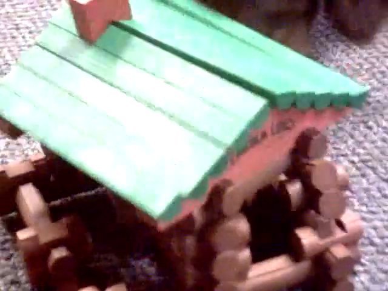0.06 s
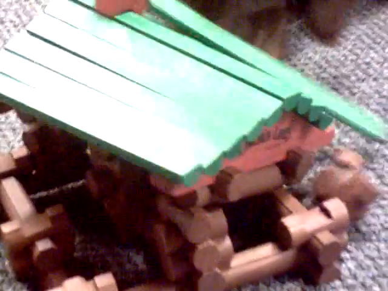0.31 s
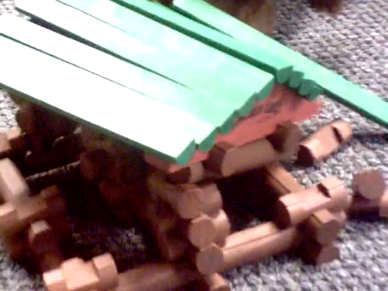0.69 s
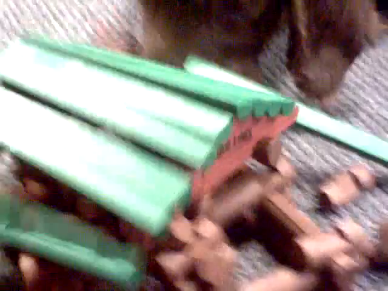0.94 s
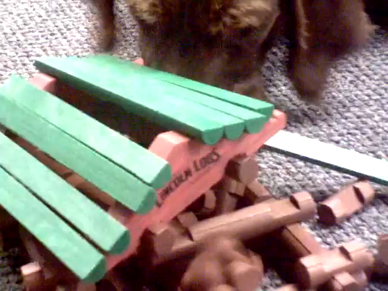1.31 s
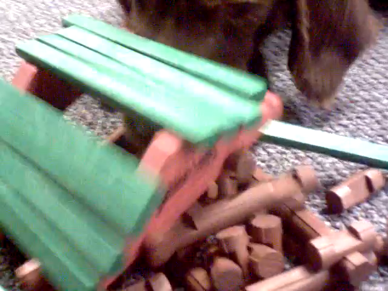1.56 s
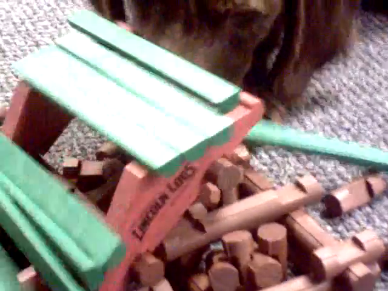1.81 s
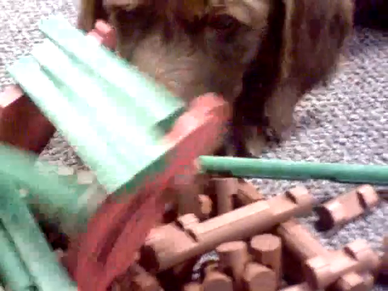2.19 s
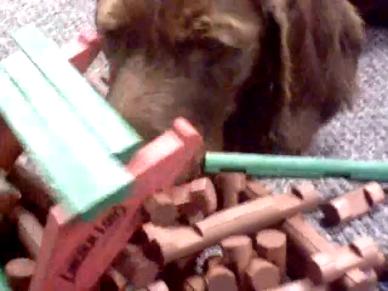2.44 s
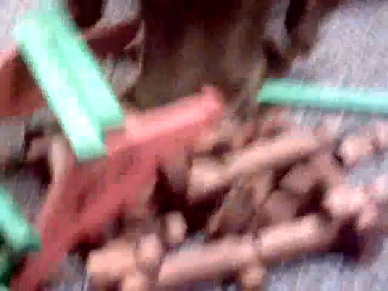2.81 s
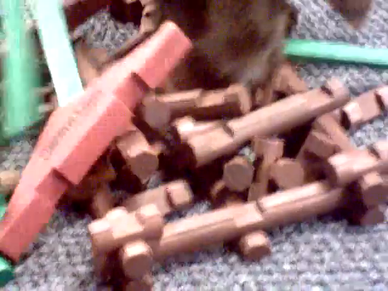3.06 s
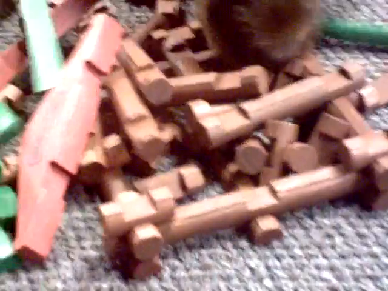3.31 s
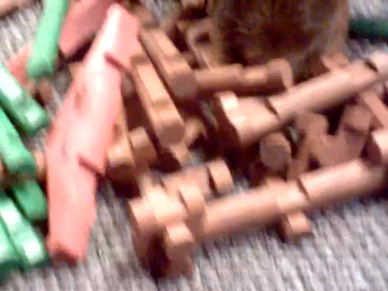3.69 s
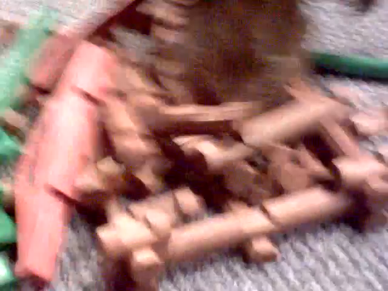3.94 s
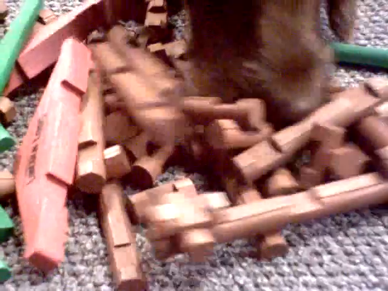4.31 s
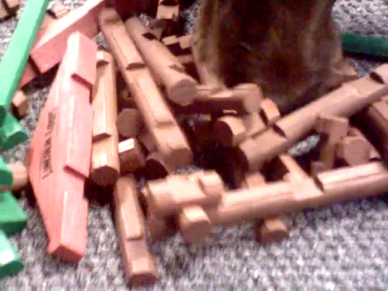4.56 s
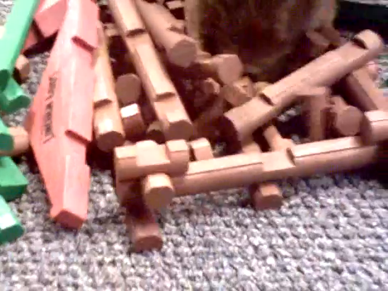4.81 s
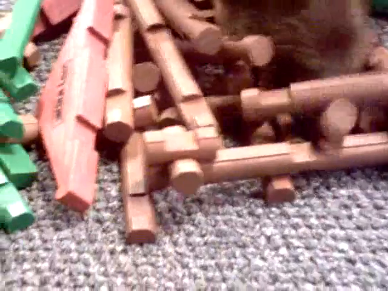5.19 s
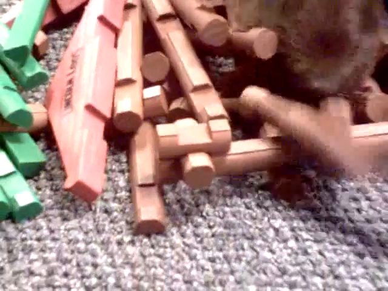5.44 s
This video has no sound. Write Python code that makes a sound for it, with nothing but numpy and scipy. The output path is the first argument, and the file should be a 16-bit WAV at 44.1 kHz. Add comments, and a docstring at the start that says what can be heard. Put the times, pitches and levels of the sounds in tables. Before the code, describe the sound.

A toy house of small wooden logs is nudged apart on a carpet in a small room. Slats and logs rub, crack and topple in several bright, dry bursts with soft thuds, getting busiest past the two-second mark. After about three seconds the clatter settles into light, scattered clicks of loose pieces. The close microphone hisses steadily and distorts briefly on the loudest knocks.

```python
"""Wood rubs and knocks, close up, as a toy house of small logs is nudged apart on a carpet.
Roof slats and logs chatter, topple and thud down, then loose pieces click in the pile.
Each knock is a dry crack plus the bending modes of the two pieces that meet.
The room is small; the narrow-band microphone hisses, and its preamplifier overloads on the loudest blows."""
import sys
import numpy as np
from scipy import signal
from scipy.fft import rfft, irfft
from scipy.io import wavfile

SR = 44100
rng = np.random.default_rng(int(sys.argv[2]) if len(sys.argv) > 2 else 0)


def persist_wave(psi):
    """Save psi, clipped to +-1, as 16-bit WAV."""
    counts = np.round(np.clip(psi, -1, 1) * 32767).astype(np.int16)
    wavfile.write(sys.argv[1], SR, np.atleast_2d(counts).T)


N = 255994
AGE = np.arange(SR // 4) / SR  # seconds since a contact


def undb(db):
    """Decibels to gain."""
    return 10 ** (np.asarray(db) / 20)


def level(x, db):
    """Scale a sound to an rms level."""
    return x * undb(db) / np.sqrt(np.mean(x ** 2))


def add(track, s, sound):
    """Mix a sound into a track at s seconds."""
    i = max(int(s * SR), 0)
    track[i:i + len(sound)] += sound[:max(N - i, 0)]


def through(x, response):
    """Pass a sound through an impulse response."""
    return signal.fftconvolve(x, response)[:len(x)]


def colour(points, size=4096):
    """Causal response of unit energy, its spectrum shaped by (Hz, dB) points."""
    hz, db = np.transpose(points)
    bin_hz = np.maximum(np.arange(size // 2 + 1) * SR / size, 1)
    gain = undb(np.interp(np.log(bin_hz), np.log(hz), db))
    cepstrum = irfft(np.log(gain))
    cepstrum[1:size // 2] *= 2  # fold to minimum phase
    cepstrum[size // 2 + 1:] = 0
    response = irfft(np.exp(rfft(cepstrum)))
    return response / np.linalg.norm(response)


def mic_band(x, top_hz=4350, taps=261):
    """Steep roll-off at the top of the microphone's band."""
    lowpass = signal.firwin(taps, top_hz, window=("kaiser", 7), fs=SR)
    return signal.fftconvolve(x, lowpass, "same")


def fade(t60):
    """Exponential decay, 60 dB down after t60 seconds."""
    return np.exp(-np.log(1000) * AGE / t60)


def mode(hz, t60, contact_s=0.00027):
    """One struck mode; it builds up while the pieces touch."""
    return np.cos(2 * np.pi * hz * AGE) * fade(t60) * (1 - np.exp(-AGE / contact_s))


def mic_hiss(hiss_db=-46, whine_db=-48):
    """The microphone's steady hiss, with a thin, wavering whine in it."""
    # Spectrum of the hiss. Each row: frequency in Hz, relative level in dB.
    hiss_spectrum = [(20, 0.5), (60, -16), (150, -8), (300, -3), (600, -0.5), (1000, -4.5), (1500, -3),
                     (2200, -7), (2950, -7), (3350, -0.5), (3700, -2.5), (4050, -10), (4450, -27)]
    hiss = mic_band(through(rng.standard_normal(N), colour(hiss_spectrum)))
    whine = mic_band(through(rng.standard_normal(N), mode(hz=3342, t60=0.1)))
    return level(hiss, hiss_db) + level(whine, whine_db)


def shove(s, length, release_db_per_s, attack_s=0.018, sag_db_per_s=19):
    """Envelope of a shove: it builds quickly and loses force while it lasts, then the pile comes to rest."""
    age = np.maximum(np.arange(N) / SR - s, 0)
    fall_db = sag_db_per_s * age + release_db_per_s * np.maximum(age - attack_s - length, 0)
    return np.minimum(age / attack_s, 1) * undb(-fall_db)


def pile_ring(detune=0.0287, build_s=0.001):
    """Every contact shakes the neighbouring pieces in a different mix."""
    # Modes of the pile. Each row: pitch in Hz, relative level in dB, 60 dB decay time in seconds.
    pile_modes = [(1193, -2, 0.069), (1341, 1.5, 0.075), (1642, 2, 0.03), (1890, 4, 0.058),
                  (2096, -1.5, 0.3), (2267, -1.5, 0.21), (2785, 7.5, .04), (3123, 15, 0.07),
                  (3330, -15, 0.2), (3400, -21, .05), (3508, 17, 0.064), (3530, -10.5, 0.028),
                  (3782, 6, 0.14), (3760, -4.5, 0.066), (4310, -4.5, 0.11)]
    chance = rng.standard_normal((len(pile_modes), 2))
    ring = sum(share * undb(db) * mode(hz * (1 + detune * offset), t60, build_s)
               for (hz, db, t60), (share, offset) in zip(pile_modes, chance))
    return ring / np.sqrt(len(pile_modes))


def jostle(rub_db=3, rattle_db=-4.5, slips_per_s=900, spread_db=4.0, parts=8):
    """Logs slide over each other in tiny slips, which set different parts of the pile ringing."""
    # Shoves that set the pile sliding.
    # Each row: start and length in seconds, relative levels of rubbing and of rattling in dB.
    shoves = [(0.023, 0.13, -42, -41.5), (0.159, 0.028, -28, -9.5), (0.228, 0.17, -40, -33),
              (0.782, 0.33, -34, -21), (1.314, 0.32, -49.5, -37.5), (1.466, 0.15, -40, -18),
              (1.672, 0.25, -43.5, -24), (1.988, 0.034, -44, -21.5), (2.17, 0.44, -43, -14),
              (2.707, 0.12, -50, -15.5), (2.972, 0.29, -48.5, -16), (3.826, 1, -58.5, -42),
              (4.182, 0.074, -48, -30), (4.852, 0.29, -49, -38), (5.169, 0.24, -46, -37.5)]
    # Spectrum of wood sliding on wood. Each row: frequency in Hz, relative level in dB.
    rub_spectrum = [(60, -37), (150, -13), (300, 0.5), (500, -11.5), (850, 6), (1300, 4), (1800, 0),
                    (2700, -7), (3600, -5.5), (4500, -8)]
    all_slips, rattle = np.zeros(N), np.zeros(N)
    for _ in range(parts):
        slips = (rng.random(N) < slips_per_s / parts / SR) * rng.choice([-1, 1], N)
        slips = slips * undb(spread_db * np.minimum(rng.exponential(size=N), 4))
        all_slips += slips
        rattle += through(slips, pile_ring())
    rub = mic_band(through(all_slips, colour(rub_spectrum)))
    rubbing = [undb(db) * shove(s, length, release_db_per_s=188.5) for s, length, db, _ in shoves]
    rattling = [undb(db) * shove(s, length, release_db_per_s=247.5) for s, length, _, db in shoves]
    return np.max(rubbing, axis=0) * level(rub, rub_db) + np.max(rattling, axis=0) * level(rattle, rattle_db)


def crack(wood, first, chatter, chatter_t60):
    """A first contact, then a dying burst of tiny ones as the notches chatter."""
    contacts = rng.standard_normal(len(AGE)) * fade(chatter_t60)
    contacts *= chatter / np.linalg.norm(contacts)
    contacts[0] += first
    return through(contacts, wood)


def knocks(wood, mode_ratio=2.69, twin_spread=0.058, twin_t60=0.011, bounce_db=-11, bounce_s=0.006):
    """A slat and a log meet: both ring, and the harder the contact, the more it cracks and shakes the pile."""
    # Single blows of a slat on a log, levels relative. Each row: start in seconds, slat's ring in dB
    # and in Hz, slat's lowest mode in dB, log's ring in dB and in Hz.
    single_blows = [(0.0902, -19, 3115, -42.5, -33, 1960), (0.1342, -28, 3240, -27, -41, 2320),
                    (0.221, -28, 3670, -20.5, -35.5, 2215), (0.2625, -13, 3370, -26, -22.5, 2360),
                    (0.2768, -5, 3464, -44, -31, 2220), (0.335, -23, 3290, -27.5, -47.5, 2330),
                    (0.402, -11.5, 3514, -42.5, -30, 1930), (0.803, -19, 3290, -27.5, -29, 2350),
                    (0.829, -16.5, 3470, -33.5, -31, 2270), (0.856, -10, 3220, -36, -29, 1960),
                    (0.869, 4, 3216, -20.5, -18.5, 2460), (0.9212, -10.5, 3490, -33, -22, 1910),
                    (0.9589, -3, 3242, -22, -14.5, 1900), (0.968, -3, 3234, -50, -40.5, 1930),
                    (1.011, -15.5, 3520, -23.5, -48, 2380), (1.0697, -15.5, 3310, -35, -40.5, 2000),
                    (1.117, -18.5, 3320, -36, -24.5, 2130), (1.142, -17.5, 3264, -31.5, -29, 1924),
                    (1.4397, -28.5, 3430, -52, -21, 2255), (1.4837, -3, 3294, -22.5, -56, 2230),
                    (1.633, -6.5, 3646, -28.5, -19.5, 2390), (1.7207, -18.5, 3286, -38.5, -21, 2290),
                    (1.7695, -18.5, 3310, -35, -20, 2350), (1.8116, -10.5, 3190, -58, -14, 1850),
                    (1.845, -1.5, 3148, -31.5, -38, 1880), (1.87, -13.5, 3090, -52, -19, 1970),
                    (2.1277, -23, 3610, -37.5, -25.5, 2230), (2.185, -17, 3270, -33.5, -17.5, 1980),
                    (2.199, -7.5, 3450, -44, -22, 1900), (2.209, -10, 3593, -23.5, -22, 2030),
                    (2.2503, -7.5, 3510, -22, -9.5, 2306), (2.277, -14, 3270, -41, -19, 2120),
                    (2.3344, -6, 3260, -28, -11, 2195), (2.4583, 3, 3102, -24, -11.5, 2185),
                    (2.479, -5.5, 3340, -43, -36, 2247), (2.49, -7.5, 3300, -27.5, -20, 1890),
                    (2.547, 0.5, 3447, -23, -9, 2368), (2.553, -7, 3155, -35, -35, 2350),
                    (2.572, -10.5, 3190, -30, -31, 1810), (2.599, -19, 3280, -33, -20.5, 1910),
                    (2.705, -13, 3420, -47, -21.5, 2130), (2.7258, -8, 3550, -58, -14.5, 2130),
                    (2.741, -5, 3078, -45, -27, 1910), (2.76, 1.5, 3506, -26.5, -13, 2345),
                    (2.769, -4, 3670, -44, -15.5, 2170), (2.822, -2, 3412, -39, -16.5, 2050),
                    (2.858, -17, 3500, -45, -21, 2266), (2.9653, -43.5, 3255, -26, -33.5, 1800),
                    (2.989, -10.5, 3235, -21, -36, 2360), (3.046, -7, 3485, -21.5, -44.5, 2090),
                    (3.0835, -11, 3333, -30.5, -19.5, 2200), (3.087, -3.5, 3134, -31, -33, 1900),
                    (3.139, -12, 3460, -24.5, -42, 1940), (3.152, -0.5, 3580, -20.5, -24, 2270),
                    (3.176, -6, 3274, -24.5, -38, 2080), (3.209, -3, 3570, -21, -25, 2120),
                    (3.237, -1, 3482, -37.5, -15.5, 2220), (3.277, -16, 3330, -34, -19.5, 2130),
                    (3.327, -41, 3680, -28.5, -42, 2090)]
    out = np.zeros(N)
    for s, slat_db, slat_hz, lowest_db, log_db, log_hz in [*single_blows, *toppling()]:
        # a hard blow presses the slat onto the log: 42 dB harder halves its ring time
        slat_t60 = 0.05 * 2 ** (-slat_db / 42)
        # notched pieces also bend in a second plane, at a slightly different pitch
        slat_twin, log_twin = 1 + twin_spread * rng.uniform(-1, 1, 2)
        upper = mode(slat_hz, slat_t60) + undb(-11) * mode(slat_hz * slat_twin, twin_t60)
        lowest = mode(slat_hz / mode_ratio, t60=0.12)
        slat = undb(slat_db) * upper + undb(lowest_db - 1) * lowest
        log = undb(log_db - 1) * (mode(log_hz, t60=0.069) - mode(log_hz * log_twin, twin_t60) / 2)
        snap = crack(wood, first=0.59, chatter=3.25, chatter_t60=0.026)
        contact = undb(2) * snap + undb(3) * pile_ring()
        blow = slat + log + undb((lowest_db + log_db) / 2) * contact
        add(out, s, blow)
        # the far end of the piece lands a moment later, in or out of step with the ringing
        add(out, s + bounce_s * rng.uniform(0.5, 2), undb(bounce_db) * blow)
    return out


def toppling(gap_s=0.0105, sag_db=7.5, scatter_s=0.0015, scatter_db=3.5, detune=0.028, max_pieces=12):
    """A stack topples in a run of nearly evenly spaced blows, tending softer, each on another piece."""
    # Toppling stacks, levels relative. Each row: start and length in seconds, slat's ring in dB
    # and in Hz, slat's lowest mode in dB, log's ring in dB and in Hz.
    stacks = [(0.1625, 0.04, -1.5, 3418, -23.5, -7.5, 2298), (1.512, 0.038, -5, 3203, -28.5, -46, 1940),
              (1.5763, 0.034, 0, 3426, -28, -9.5, 2305), (2.0155, 0.021, 6.5, 3526, -22.5, -7.5, 2264),
              (2.352, 0.056, 3, 3351, -25, -9, 2096), (3.0045, 0.024, 1.5, 3490, -17, -19, 2140)]
    for s, length, slat_db, slat_hz, lowest_db, log_db, log_hz in stacks:
        chance = rng.standard_normal((max_pieces, 4))
        progress = np.linspace(0, 1, 1 + round(length / gap_s))
        for along, (late, hard, slat_offset, log_offset) in zip(progress, chance):
            start = s + along * (length + scatter_s * late)
            force_db = scatter_db * hard - sag_db * along
            yield (start, slat_db + force_db, slat_hz * (1 + detune * slat_offset),
                   lowest_db + force_db, log_db + force_db, log_hz * (1 + detune * log_offset))


def clicks(wood, ring_db=-18, pile_db=-12, hollow_db=-9):
    """Damped pieces give a short tick, a hollow note that depends on the log's length, and a faint ring."""
    # Dry taps of pieces lying in the pile, levels relative.
    # Each row: start in seconds, tick in dB and in Hz, contact in dB, hollow note in Hz.
    taps = [(0.397, -25, 3390, -21, 1175), (0.5262, -25, 3510, -29, 1710),
            (1.276, -20.5, 3770, -33.5, 2510), (1.3648, -18.5, 3430, -26, 2300),
            (1.992, -22, 3730, -20.5, 1383), (3.9381, -17, 3430, -27.5, 2530),
            (4.118, -19, 3830, -31, 2580), (4.1819, -20, 3705, -27, 2440), (4.19, -20, 3400, -27, 1920),
            (4.202, -28, 3540, -24.5, 1920), (4.2657, -17, 3475, -18, 2000),
            (4.3615, -19.5, 3730, -32, 2320), (4.4508, -32, 2850, -22, 1640),
            (4.5169, -6.5, 3433, -25.5, 1200), (4.6736, -40, 3720, -29.5, 2150),
            (4.7304, -25, 3720, -27.5, 2270), (4.9333, -20.5, 3800, -18.5, 1890),
            (4.994, -27, 3460, -28.5, 1500), (5.022, -48, 3350, -23.5, 1240),
            (5.08, -46, 3140, -25.5, 1330), (5.1876, -27, 2910, -24, 1540), (5.198, -20.5, 3720, -27, 1410),
            (5.287, -38, 3430, -26.5, 2030), (5.334, -41, 3650, -26.5, 1550),
            (5.3718, -28, 3110, -32, 1770), (5.42, -20.5, 2980, -25, 1640),
            (5.5037, -30.5, 3560, -27, 1390), (5.543, -21, 3530, -37.5, 1720),
            (5.6594, -8, 3045, -18, 1830), (5.7538, -24.5, 3200, -48.5, 1570)]
    out = np.zeros(N)
    for s, tick_db, tick_hz, contact_db, hollow_hz in taps:
        tick = mode(tick_hz, t60=0.014) + undb(ring_db) * mode(tick_hz, t60=0.15)
        hollow = undb(hollow_db) * mode(hollow_hz, t60=0.05)
        snap = crack(wood, first=1.0, chatter=1.0, chatter_t60=0.014)
        contact = undb(1) * snap + undb(pile_db) * pile_ring() + hollow
        add(out, s, undb(tick_db) * tick + undb(contact_db) * contact)
    return out


def thuds(gain_db=6.0, t60=0.027, push_s=0.0026, upper_db=-4, upper_ratio=1.247):
    """A cushioned landing is a low, short bump."""
    # Pieces landing on the carpet or on a wedged log.
    # Each row: start in seconds, relative level in dB, pitch in Hz.
    landings = [(0.818, -25, 302), (0.955, -16, 351), (1.045, -27, 291), (1.189, -25.5, 296),
                (1.276, -32.5, 288), (1.759, -27.5, 810), (1.843, -26.5, 398), (2.57, -26, 320),
                (2.9, -35.5, 283), (3.293, -40, 328), (5.321, -31.5, 770), (5.641, -26, 770),
                (5.658, -30.5, 657)]
    out = np.zeros(N)
    for s, db, hz in landings:
        bump = mode(hz, t60, push_s) + undb(upper_db) * mode(hz * upper_ratio, t60, push_s)
        add(out, s, undb(db + gain_db) * bump)
    return out


def room(x, wet_db=-17, t60=0.23, gap_s=0.01):
    """At close range, a small carpeted room adds only a short, weak tail."""
    tail = rng.standard_normal(len(AGE)) * fade(t60) * (AGE > gap_s)
    return x + undb(wet_db) * through(x, tail / np.linalg.norm(tail))


def scene():
    """The falling house in its room, on one close microphone, over steady hiss."""
    # Spectrum of wood striking wood. Each row: frequency in Hz, relative level in dB.
    crack_spectrum = [(60, -38.5), (150, -21.5), (300, 0.5), (550, -3.5), (850, 1), (1300, -5), (1600, 6),
                      (2100, -0.5), (2650, 9), (3050, 7.5), (3450, 0.5), (3950, 0.5), (4500, -8)]
    wood = colour(crack_spectrum)
    wood = wood / np.abs(mic_band(wood)).max()
    pieces = knocks(wood) + clicks(wood) + thuds() + jostle()
    return (mic_band(room(pieces)) + mic_hiss())[None]


def record(dry, swing=0.82, ceiling=0.75, bias_hz=18, bias_shift=0.22,
           band_hz=5000, treble_hz=13000, top_hz=15900):
    """Overload shifts the preamplifier's bias into a low bump; a second stage clips flat and spits treble."""
    overloaded = (np.abs(dry[0]) > ceiling).astype(float)
    bump = bias_shift * signal.sosfilt(signal.butter(1, bias_hz, fs=SR, output="sos"), overloaded)
    limited = np.clip(dry[0], -swing, swing)
    preamp = signal.sosfiltfilt(signal.butter(8, band_hz, fs=SR, output="sos"), limited) + bump
    oversampled = signal.resample_poly(preamp, 4, 1)  # the flat tops form between samples too
    clipped = signal.resample_poly(np.clip(oversampled, -ceiling, ceiling), 1, 4)
    softened = signal.sosfilt(signal.butter(1, treble_hz, fs=SR, output="sos"), clipped)
    return signal.sosfilt(signal.ellip(8, 0.2, 70, top_hz, fs=SR, output="sos"), softened)[None]


dry = scene()
out = record(dry)
persist_wave(out)
```